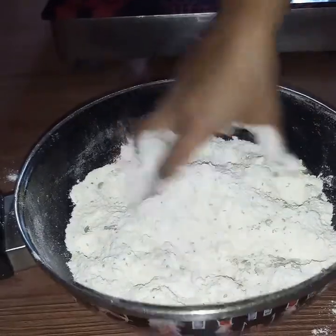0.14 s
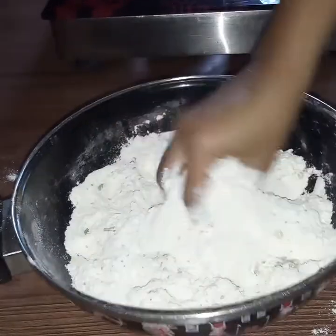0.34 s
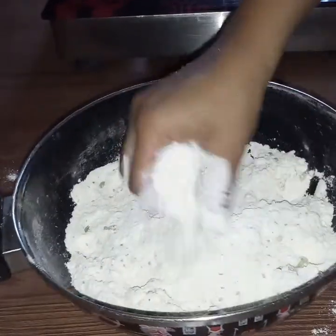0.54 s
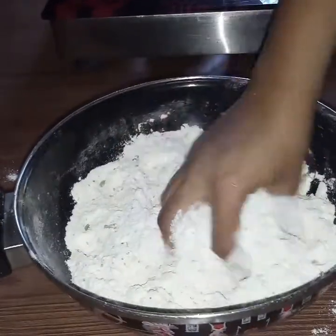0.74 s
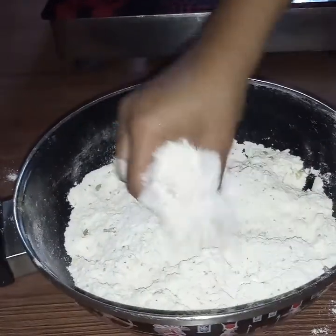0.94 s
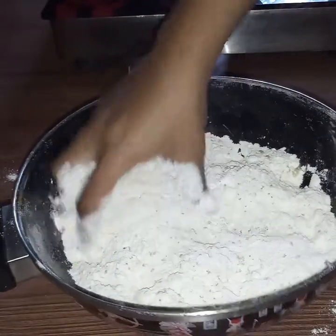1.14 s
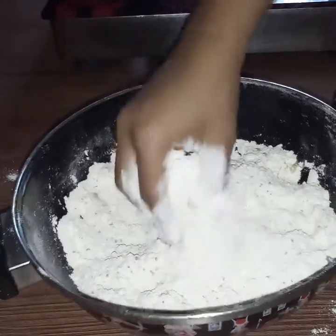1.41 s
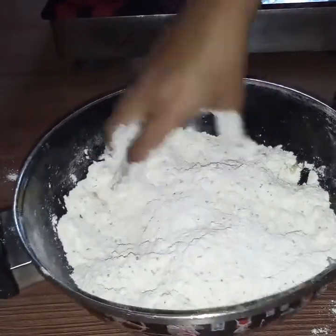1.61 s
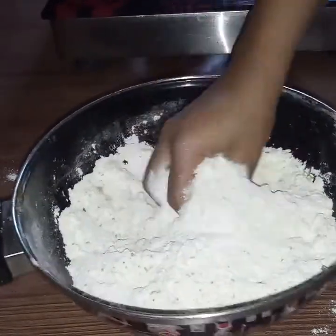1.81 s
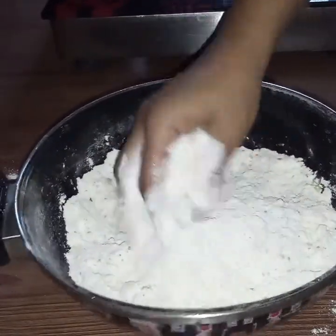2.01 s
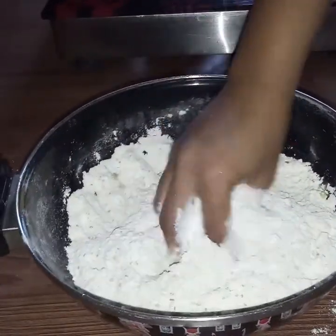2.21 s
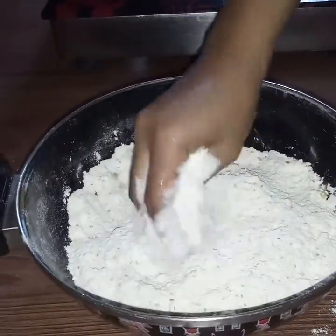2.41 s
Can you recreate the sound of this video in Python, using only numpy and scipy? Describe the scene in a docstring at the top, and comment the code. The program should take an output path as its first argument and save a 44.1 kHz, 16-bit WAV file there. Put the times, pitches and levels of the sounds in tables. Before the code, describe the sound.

A hand works damp flour in a metal bowl, each of five strokes a soft hiss and crunch. The bowl rocks with a few light clacks and dull thumps on the table, heard up close in a small kitchen.

```python
"""A hand works damp flour in a steel bowl on a wooden table, close by in a small kitchen.
From the start the bowl drags faintly under the hand's weight; then it rocks with a metal clack.
Five strokes follow, each a fine hiss as the fingers touch and a coarser crunch as the flour packs.
Among them, fingers and lumps pat the wall, and the pushes make the bowl thump on the table and
clack again. The room rings briefly after each sound."""
import sys
import numpy as np
from scipy import signal
from scipy.io import wavfile

SR = 44100
rng = np.random.default_rng(int(sys.argv[2]) if len(sys.argv) > 2 else 0)


def materialize(psi):
    """Save the field psi as 16-bit PCM at rate SR to the path in sys.argv[1].

    A 1-D psi becomes a single channel; in a 2-D psi each row is a channel.
    """
    bounded = np.clip(np.atleast_2d(psi).T, -1, 1)
    quanta = np.round(bounded * 32767).astype(np.int16)
    wavfile.write(sys.argv[1], SR, quanta)


N = 112454
TIME = np.arange(N) / SR


def amp(db):
    """Amplitude grows tenfold for every 20 dB."""
    return 10 ** (np.asarray(db) / 20)


def unit(x):
    """Normalisation to an rms of 1."""
    return x / np.sqrt(np.mean(x ** 2) + 1e-20)


def read(points, hz):
    """Interpolation of a table on a logarithmic frequency axis."""
    f, value = np.transpose(points)
    return np.interp(np.log(hz + 1), np.log(f + 1), value)


def add(mix, start_s, sound):
    """Superposition: a sound adds to the mix from its start time on."""
    part = mix[max(round(start_s * SR), 0):][:len(sound)]
    part += sound[:len(part)]


def colour(x, spectrum, tilt=0, size=4096):
    """A minimum-phase filter of unit energy imposes a spectrum, tilted in dB per octave."""
    hz = abs(np.fft.fftfreq(size, 1 / SR))
    log_gain = np.log(amp(read(spectrum, hz) + tilt * np.log2(hz + 20)))
    response = np.exp(np.conj(signal.hilbert(log_gain)))
    taps = np.fft.ifft(response).real[:size // 2]
    return signal.fftconvolve(x, taps / np.linalg.norm(taps))[:len(x)]


def background():
    """Stationary filtered noise gives a faint rumble and a high hiss."""
    # Each row: frequency in Hz, relative level in dB.
    spectrum = [(20, 6), (60, 18), (110, 0), (170, 5), (300, -36), (600, 1), (2000, -27), (3800, -46),
                (6500, -46), (9500, -15), (13000, -3.5), (16000, -3)]
    return amp(-72.5) * colour(rng.standard_normal(N), spectrum)


def dragging():
    """Sliding friction: the pressed bowl groans on the table and loose flour scrapes along its wall."""
    # Each row: time in seconds, groan level in dB, scrape level in dB.
    pressure = [(0, -67, -62), (.2, -64.5, -66), (0.249, -52, -57), (.5, -57.5, -60.5), (.6, -53.5, -65),
                (.8, -52.5, -59.5), (1.0, -65, -67), (1.2, -63.5, -63.5), (1.234, -51.5, -59),
                (1.432, -50, -64), (1.7, -51, -55.5), (2.05, -52, -62), (2.17, -55.5, -61),
                (2.27, -46, -60), (2.368, -65, -62), (2.55, -53, -66.5)]
    # Each row of both spectra: frequency in Hz, relative level in dB.
    groan_spectrum = [(20, -59), (60, -8), (85, -3), (101, 4.5), (120, 3), (150, -17.5), (200, -13),
                      (400, -39.5), (1000, -51), (4000, -55)]
    scrape_spectrum = [(200, 4.5), (700, -0.5), (1700, -3), (2600, -2), (3400, -3.5), (3900, 2.5),
                       (4400, -2.5), (5100, -1.5), (6500, -1), (8500, -11), (9500, -20), (12000, -13),
                       (16000, -14)]
    times, groan_db, scrape_db = np.transpose(pressure)
    groan = rng.standard_normal(N) * amp(np.interp(TIME, times, groan_db))
    scrape = rng.standard_normal(N) * amp(np.interp(TIME, times, scrape_db))
    return colour(groan, groan_spectrum) + colour(scrape, scrape_spectrum)


def clacks():
    """Brief contact spreads energy over a wide band: the rocking bowl chatters for milliseconds."""
    # Each row: start in seconds, level in dB, tilt in dB per octave.
    contacts = [(.165, -41.5, 13.5), (1.5402, -52, -6), (1.5598, -31.5, -3), (1.9805, -56, -12),
                (1.9998, -33.5, -3)]
    # Each row: frequency in Hz, relative level in dB.
    spectrum = [(200, -13.5), (1000, -15.5), (2200, -2.5), (2900, -4.5), (3800, 7), (4600, 1), (5900, 7),
                (8000, 1), (9500, -4.5), (12000, -3.5), (16000, -6)]
    attack_s, hold_until_s, decay_s = 0.0016, 0.0019, 0.0032
    t, out = TIME[:SR // 10], np.zeros(N)
    envelope = np.minimum(t / attack_s, 1) * np.exp(-np.maximum(t - hold_until_s, 0) / decay_s)
    for start, db, tilt in contacts:
        burst = envelope * rng.choice([-1, 1], len(t))
        add(out, start, amp(db) * colour(burst, spectrum, tilt))
    return out


def grains(spread_db, clump_db, slips_per_s=7000, clump_s=0.0076):
    """Granular friction is a dense train of tiny slips, uneven in size and clumped in time."""
    size = amp(spread_db * np.minimum(rng.exponential(1, N), 4))
    slips = size * rng.choice([-1, 1], N) * (rng.random(N) < slips_per_s / SR)
    window = np.hanning(int(2 * clump_s * SR))
    clumps = unit(signal.fftconvolve(rng.standard_normal(N), window, "same"))
    return unit(slips * amp(clump_db * clumps))


def press(start, end, rise_db_per_s=300, arch_db=3, fall_db_per_s=387):
    """The envelope of finger pressure grows exponentially, arches over its hold and decays."""
    progress = np.clip((TIME - start) / max(end - start, 1e-3), 0, 1)
    before_db = rise_db_per_s * np.maximum(start - TIME, 0)
    after_db = fall_db_per_s * np.maximum(TIME - end, 0)
    return amp(-before_db - arch_db * (2 * progress - 1) ** 2 - after_db)


def resonate(x, hz, width_hz):
    """Two resonators in series pass a band whose centre follows the curve hz."""
    carrier = np.exp(2j * np.pi * np.cumsum(hz) / SR)
    pole = np.exp(-np.pi * width_hz / SR)
    return (carrier * signal.sosfilt([[1 - pole, 0, 0, 1, -pole, 0]] * 2, x / carrier)).real


def flour():
    """Slipping grains brush, hiss and crunch; the resonance of the hollow under the hand sinks."""
    # Each row: first touch, full press and release in seconds; brush, hiss, crunch and hollow
    # levels in dB; the hollow's pitch at full press and at release in Hz.
    strokes = [(0.183, 0.254, 0.35, -49, -41.5, -46, -53.5, 6100, 3670),
               (0.726, 0.767, 0.84, -87, -47.5, -48.5, -52.5, 4400, 2670),
               (1.152, 1.256, 1.287, -55.5, -36.5, -40, -47.5, 3900, 2590),
               (1.626, 1.748, 1.821, -50.5, -39, -42.5, -48.5, 5660, 3760),
               (2.18, 2.213, 2.274, -93, -48, -43.5, -52, 3530, 3340)]
    # Each row of the three spectra: frequency in Hz, relative level in dB.
    brush_spectrum = [(500, -47), (3000, -62), (6000, -14), (8600, -4), (9700, -11), (10800, 0.5),
                      (13500, 0), (16000, -9)]
    hiss_spectrum = [(400, -33), (1500, -38), (3000, -17), (5500, 1), (8500, 2), (9400, -2), (10500, 2.5),
                     (13300, 1.5), (14600, -3), (16000, -2.5)]
    crunch_spectrum = [(150, -21), (450, -20), (1100, -6.5), (1650, 1.5), (1950, -5.5), (2350, 2.5),
                       (2850, -3), (3600, 4.5), (5000, -2.5), (8000, -2.5), (16000, -17)]
    onset_s, crunch_lag_s = 0.034, 0.016
    brush, hiss, crunch, hollow = np.zeros((4, N))
    for touch, start, end, brush_db, hiss_db, crunch_db, hollow_db, first_hz, last_hz in strokes:
        onset = np.clip((TIME - touch) / onset_s, 0, 1)
        packing = onset * press(start + crunch_lag_s, end + crunch_lag_s)
        brush += amp(brush_db) * onset * press(touch, start)
        hiss += amp(hiss_db) * onset * press(start, end)
        crunch += amp(crunch_db) * packing
        hollow_hz = np.interp(TIME, [start, end], [first_hz, last_hz])
        resonance = resonate(grains(spread_db=-2.5, clump_db=-1), hollow_hz, width_hz=830)
        hollow += amp(hollow_db) * packing * unit(resonance)
    return (colour(brush * grains(spread_db=4, clump_db=1), brush_spectrum)
            + colour(hiss * grains(spread_db=2.5, clump_db=0.5), hiss_spectrum)
            + colour(crunch * grains(spread_db=0.5, clump_db=3.0), crunch_spectrum) + hollow)


def wall_echoes(x, swing=0.13, hand_hz=2.1):
    """Comb filtering: echoes off the steel wall shift in delay as the hand moves to and fro."""
    # Each row: mean delay in milliseconds, level in dB.
    echoes = [(0.702, -26), (1.5, -17), (2.6, -21.5)]
    drift = 1 + swing * np.sin(2 * np.pi * hand_hz * TIME)
    fine = signal.resample_poly(x, 4, 1)  # oversampling keeps the treble in fractional delays
    fine_time = np.linspace(0, N / SR, len(fine), endpoint=False)
    return x + sum(amp(db) * np.interp(TIME - drift * ms / 1000, fine_time, fine) for ms, db in echoes)


def pats(decay_s=0.0035):
    """Damped impacts: flour deadens the knocks of fingers and lumps against the bowl."""
    # Each row: start in seconds, level in dB, tilt in dB per octave.
    knocks = [(0.2446, -37.5, 0.5), (0.3441, -29.5, 0), (0.3502, -34, 8), (.369, -39, 2), (.566, -49, -4),
              (0.598, -46.5, -3), (0.7459, -47, 1.5), (0.766, -40, 5), (1.225, -45.5, -2.5),
              (1.317, -34.5, 4.5), (1.525, -49.5, -4), (1.6454, -42, -5), (1.708, -43.5, -1.5),
              (1.758, -39, -2), (1.83, -35, 0), (1.844, -31, -7.5), (1.9593, -34.5, -6), (1.981, -36, -0.5),
              (2.072, -49.5, 1), (2.277, -41, 1), (2.4838, -53.5, -3)]
    # Each row: frequency in Hz, relative level in dB.
    spectrum = [(100, -11), (400, -4), (700, 1.5), (1100, 7), (1600, 5), (2400, 2), (4000, -1), (8000, -14),
                (16000, -24)]
    t, out = TIME[:SR // 10], np.zeros(N)
    for start, db, tilt in knocks:
        burst = rng.choice([-1, 1], len(t)) * np.exp(-t / decay_s)
        add(out, start, amp(db) * colour(burst, spectrum, tilt))
    return out


def thumps():
    """A blow thuds, rattles and excites the modes of bowl and table; long contact weakens high modes."""
    # Each row: start in seconds, level in dB, contact time in milliseconds, thud pitch in Hz.
    blows = [(0.3436, -23, 2.05, 171.3), (0.3671, -27.5, 6.6, 193), (0.7463, -32, 4.1, 162.4),
             (.7715, -35, 6.7, 126), (1.53, -36, 1.6, 121), (1.756, -40, 0.67, 143),
             (1.828, -29.5, 2.04, 182.7), (1.9568, -35, 1.4, 166.6), (1.979, -42, 1.4, 146),
             (2.199, -33.5, 3.4, 183.5)]
    # Each row: frequency in Hz, level in dB, time to fall 60 dB in seconds.
    modes = [(100.83, -16, 0.94), (114, -29.5, 0.64), (145.5, -6.5, 0.44), (189.6, -5.5, 0.32),
             (238.3, -10.5, 0.21), (309.9, -20, 0.32), (369.6, -26, 0.55), (548.5, -13.5, 0.15),
             (596, -14.5, 0.29), (692, -15.5, 0.48)]
    # Each row: frequency in Hz, relative level in dB.
    rattle_spectrum = [(30, -64), (80, 6.5), (170, -2.5), (300, 0.5), (450, -7.5), (680, -12.5),
                       (1200, -23.5), (5000, -33)]
    rise_s, thud_decay_s, rattle_decay_s = 0.0032, 0.026, 0.035
    t, out = TIME[:SR], np.zeros(N)
    attack = 1 - np.exp(-t / rise_s)
    for start, db, contact_ms, thud_hz in blows:
        ring = np.zeros(SR)
        for hz, mode_db, t60 in modes:
            strength = amp(mode_db) / (1 + (hz * contact_ms / 1000) ** 2)
            ring += strength * amp(-60 * t / t60) * np.sin(2 * np.pi * hz * t)
        thud = amp(-2.5) * np.exp(-t / thud_decay_s) * np.sin(2 * np.pi * thud_hz * t)
        burst = rng.standard_normal(SR) * np.exp(-t / rattle_decay_s)
        rattle = amp(-15.5) * colour(burst, rattle_spectrum)
        add(out, start, amp(db) * attack * (thud + rattle + ring))
    return out


def room(x, wet_db, gap_s=0.00488):
    """Reverberation: sparse reflections fill the kitchen, each band decaying at its own rate."""
    # Each row: frequency in Hz, time to fall 60 dB in seconds.
    decay_times = [(100, 0.46), (300, 0.86), (1800, 0.5), (5000, 0.32), (13000, 0.28)]
    reflections = rng.choice([-1., 1.], SR) * (rng.random(SR) < 0.1) * (np.arange(SR) > gap_s * SR)
    hz, t, bands = signal.stft(reflections, SR, nperseg=256)
    decay = amp(-60 * t / read(decay_times, hz)[:, None])
    tail = signal.istft(bands * decay, SR)[1]
    return x + amp(wet_db) * signal.fftconvolve(x, tail / np.linalg.norm(tail))[:N]


def scene():
    """The sources superpose in one channel; strokes and impacts reverberate."""
    mix = background() + room(wall_echoes(flour()), wet_db=-11)
    mix += room(thumps(), wet_db=-9)
    mix += room(pats(), wet_db=-4.5)
    mix += room(clacks(), wet_db=-7)
    return (mix + dragging())[None]


def record(dry, low_cut_hz=62.6, top_hz=15800):
    """Band limiting: the microphone sheds deep bass and a steep low-pass removes the highest treble."""
    low_cut = signal.butter(2, low_cut_hz, "high", fs=SR, output="sos")
    low_pass = signal.firwin(511, top_hz, window=("kaiser", 9), fs=SR)
    return signal.oaconvolve(signal.sosfilt(low_cut, dry), low_pass[None], "same")


dry = scene()
out = record(dry)
materialize(out)
```